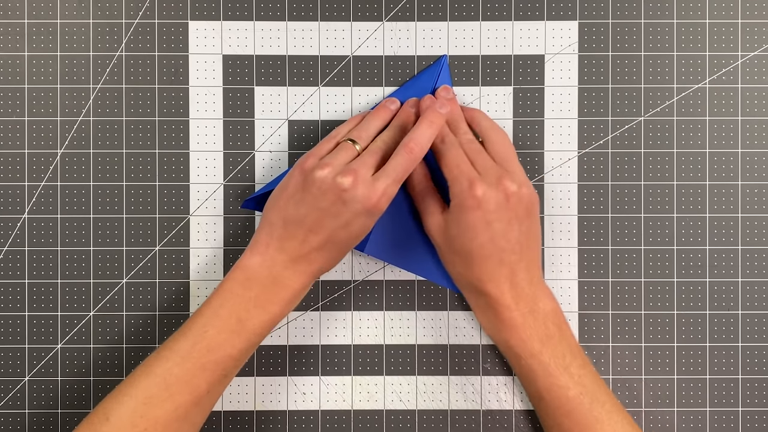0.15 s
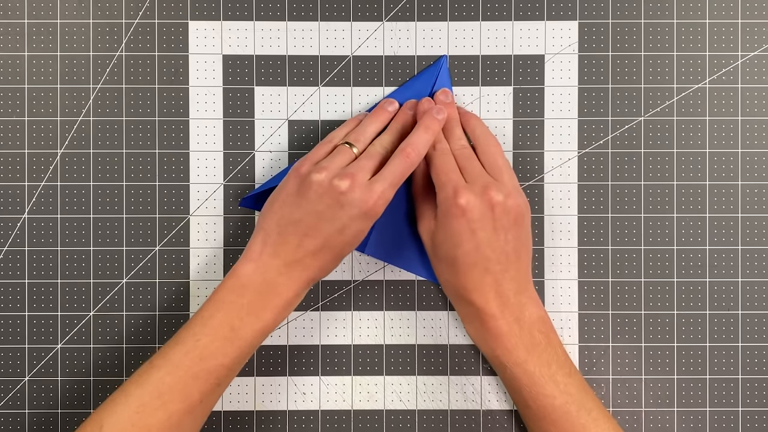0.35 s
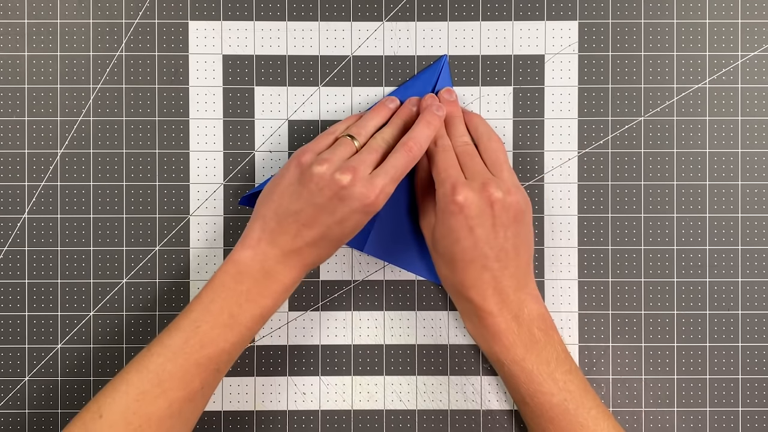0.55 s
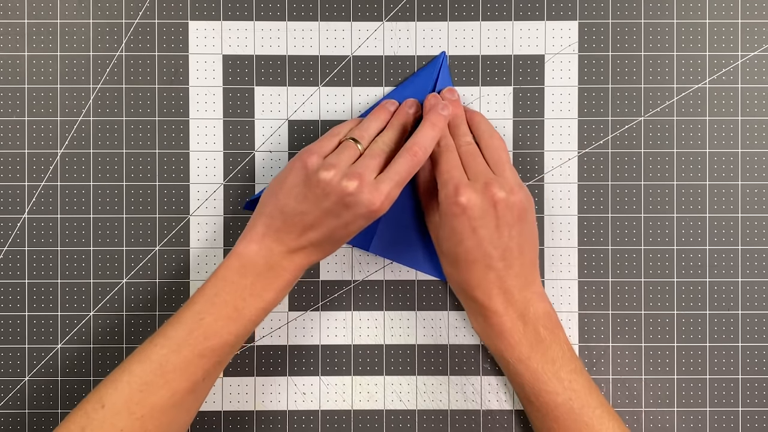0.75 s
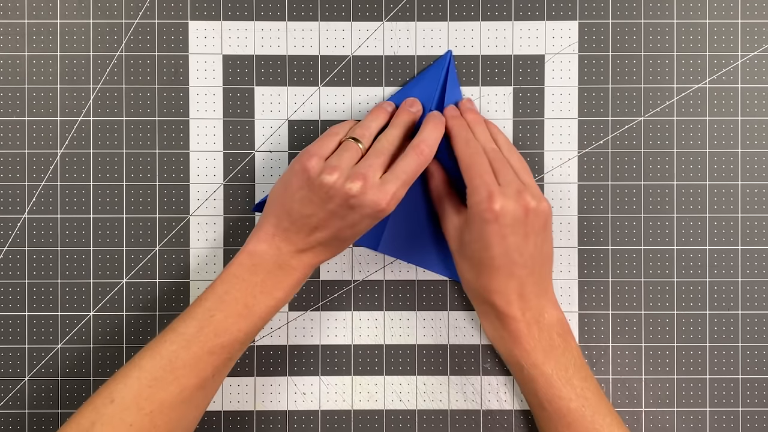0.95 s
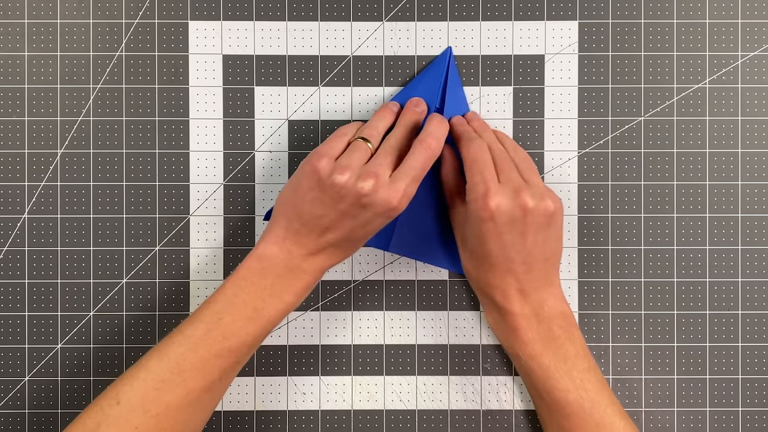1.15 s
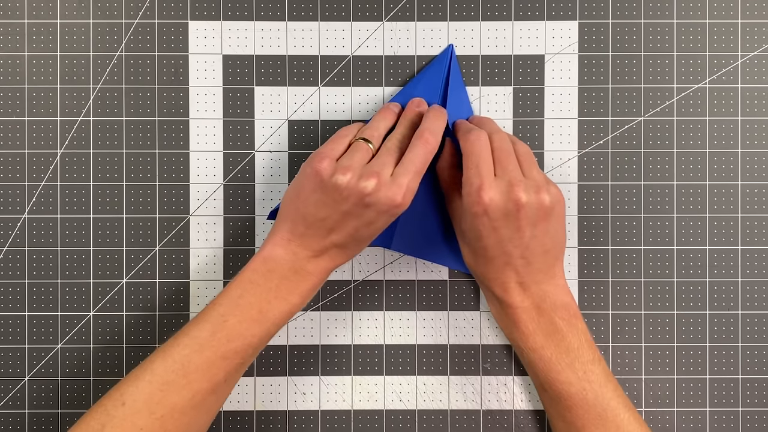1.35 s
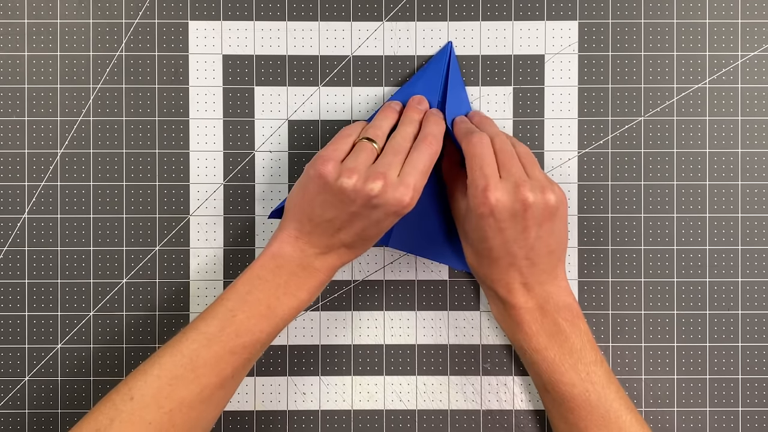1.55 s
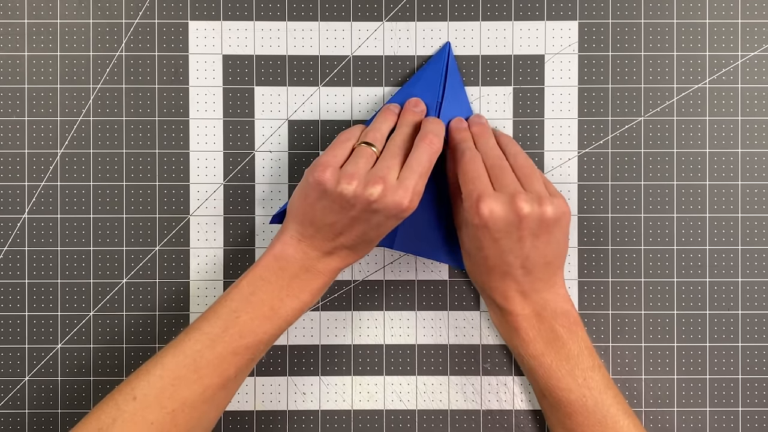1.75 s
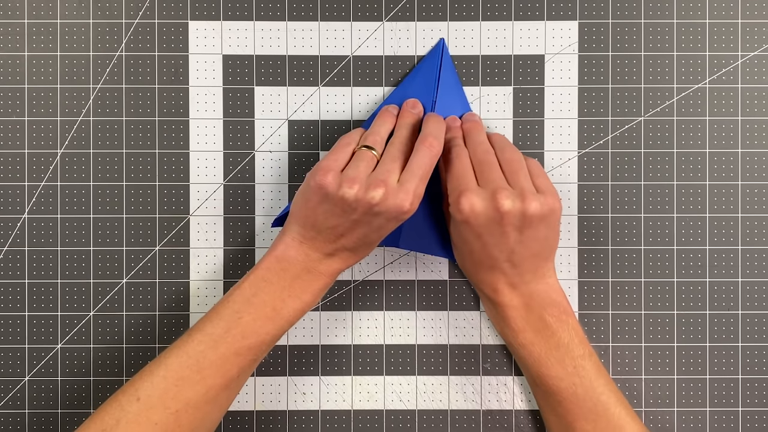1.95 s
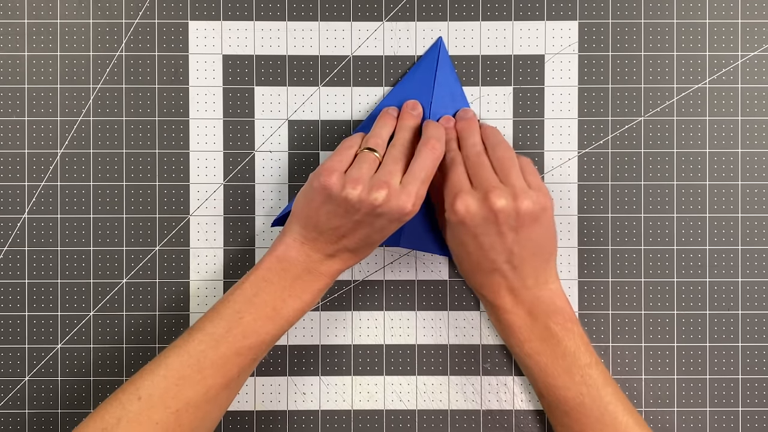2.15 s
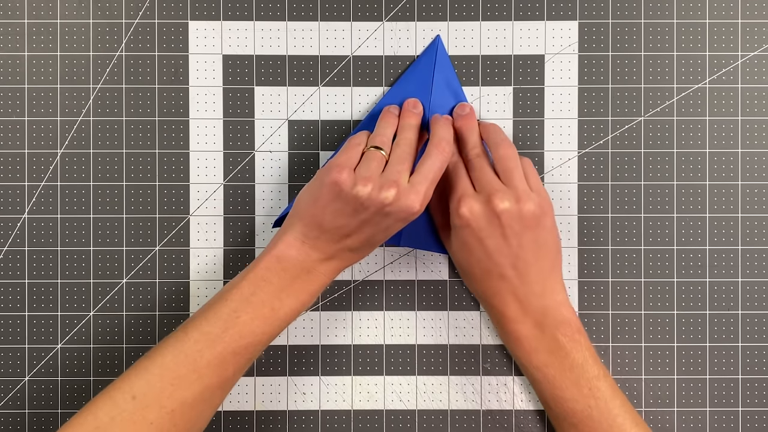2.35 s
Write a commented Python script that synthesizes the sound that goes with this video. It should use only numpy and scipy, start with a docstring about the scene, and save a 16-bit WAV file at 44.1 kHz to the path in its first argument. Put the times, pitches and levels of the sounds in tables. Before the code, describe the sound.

Paper folding heard close up: soft sliding rustles and crisp little snaps in irregular clusters, strongest near 0.3, 1.4 and 2.2 seconds, with quiet gaps, in a small quiet room with faint hiss.

```python
"""In a small room, a sheet of paper is folded on a cutting mat, close to a microphone.
Fingers slide along the folds as friction noise, swelling and fading with each jerky stroke.
The sheet buckles in short snaps, decaying bursts of fibre slips, as the crease is pressed flat.
Damped modes of the table hum softly under two presses.
The room answers the paper with near reflections and a short diffuse tail, over a faint hiss."""
import sys
import numpy as np
from scipy import signal
from scipy.io import wavfile
from scipy.ndimage import uniform_filter1d

SR = 44100
rng = np.random.default_rng(int(sys.argv[2]) if len(sys.argv) > 2 else 0)


def waveform_to_disk(signal):
    """Save audio, clipped to [-1, 1], as 16-bit WAV at the path in sys.argv[1]."""
    frames = np.transpose(np.atleast_2d(signal))
    scaled = np.clip(frames, -1, 1) * 32767
    samples = np.round(scaled).astype(np.int16)
    wavfile.write(sys.argv[1], SR, samples)


N = 110250

# Borders of the sheet's four registers, push, body, crack and edge: (frequency [Hz])
BAND_BORDERS_HZ = [180, 750, 2250, 5200, 15500]


def amp(db):
    """Level law: 20 dB is a tenfold amplitude."""
    return 10 ** (np.asarray(db) / 20)


def unit(x):
    """Normalization: scales the mean power, and so the rms, to 1."""
    return x / np.sqrt(np.mean(x ** 2) + 1e-20)


def read(points, hz):
    """Spectral interpolation: a table is read along a logarithmic frequency axis."""
    f, value = np.transpose(points)
    return np.interp(np.log(hz + 1), np.log(f + 1), value)


def add(mix, s, sound):
    """Superposition: a sound is summed into the mix from time s [s], cut at the end of the mix."""
    part = mix[round(s * SR):][:len(sound)]
    part += sound[:len(part)]


def colour(x, points, size=4096):
    """Minimum-phase filtering: the Hilbert transform of the log gain gives the phase of a causal filter."""
    hz = abs(np.fft.fftfreq(size, 1 / SR))
    log_gain = np.log(amp(read(points, hz)))
    response = np.exp(np.conj(signal.hilbert(log_gain)))
    taps = np.fft.ifft(response).real[:size // 2]
    return signal.fftconvolve(x, taps)[:len(x)]


def band(x, index):
    """Band-pass filtering: keeps one register, 0 push, 1 body, 2 crack or 3 edge."""
    borders = BAND_BORDERS_HZ[index:index + 2]
    return signal.sosfilt(signal.butter(3, borders, "band", fs=SR, output="sos"), x)


def waver(hz):
    """Low-pass random process: slow irregular motion of rms 1, mostly below hz [Hz]."""
    return unit(signal.sosfilt(signal.butter(2, hz, fs=SR, output="sos"), rng.standard_normal(N)))


def hiss(points):
    """Stationary noise: a steady random signal is shaped to a given spectrum and set to one rms level."""
    level_db = -64
    return amp(level_db) * unit(colour(rng.standard_normal(N), points))


def slides():
    """Stick-slip friction: smooth noise and sparse fibre crackle swell with each jerky stroke."""
    # Strokes of fingers and paper; crack level before colouring, other registers relative to it:
    # (peak time [s], rise [s], fall [s], crack level [dB], push [dB], body [dB], edge [dB])
    strokes = [ (0.029, 0.033, 0.021, -55, -10.5, -3.5, -5.5), (0.134, 0.021, 0.037, -63, 5.5, 3, 3),
               (.248, .06, 0.051, -39.5, -18.5, -5.5, -7), (.335, 0.034, 0.011, -46.5, -24, -9, -1.5),
               (.780, 0.018, 0.051, -56, -3, 2.5, -11), (0.871, .028, 0.019, -49.5, -6.5, -3, 1.5),
               (0.961, 0.018, 0.036, -56, -8, -3.5, -3), (1.02, 0.043, 0.1, -61, -2, -1.5, -5.5),
               (1.24, 0.23, 0.041, -66, -5, -5.5, -3.5), (1.378, 0.024, 0.025, -51, -1, 1, -16),
               (1.445, 0.023, 0.03, -51.5, -15, -3, -22), (1.56, 0.03, 0.068, -68, 0, -2, -14),
               (1.802, 0.019, 0.014, -49, -10, -2.5, -4), (1.90, 0.085, 0.24, -63.5, -4.5, 0, -6),
               (2.025, 0.044, 0.032, -55, -9, 4.5, -11), (2.115, 0.029, 0.057, -53, -12, -6.5, -6),
               (2.202, 0.016, .032, -40, -12, -3.5, -2), (2.44, 0.11, 0.063, -59.5, -2, -1, -14)]
    # Colour of the sliding sheet: (frequency [Hz], gain [dB])
    sheet_gain = [(150, -4.5), (400, -3), (750, -1.5), (1130, 5.5), (1500, 0), (1900, -1), (2400, -0.5),
                  (3200, 6.5), (4600, -9.5), (6500, 1.5), (10000, -3), (15000, -13.5)]
    grains_per_s, grain_spread_db = 1600, 3.5
    grain_share = 0.44  # crackle's part of the power
    jerk_db, jerk_hz = 1.4, 80

    t = np.arange(N) / SR
    power = np.zeros((len(BAND_BORDERS_HZ) - 1, N))
    for s, rise, fall, level_db, push_db, body_db, edge_db in strokes:
        stroke = np.exp(-((t - s) / np.where(t < s, rise, fall)) ** 2)
        register_db = level_db + np.array([push_db, body_db, 0, edge_db])
        power += (amp(register_db)[:, None] * stroke) ** 2

    sizes = amp(grain_spread_db * np.minimum(rng.exponential(1, N), 4)) * rng.choice([-1, 1], N)
    grains = unit(sizes * (rng.random(N) < grains_per_s / SR))
    smooth = rng.standard_normal(N)
    friction = np.sqrt(grain_share) * grains + np.sqrt(1 - grain_share) * smooth
    friction *= amp(jerk_db * waver(jerk_hz))
    registers = [np.sqrt(p) * unit(band(friction, k)) for k, p in enumerate(power)]
    return colour(sum(registers), sheet_gain)


def snap(length, level_db, push_db, body_db, edge_db, size=2048):
    """Impulsive buckling: a click opens a decaying burst of fibre slips, and the mat answers the push."""
    attack_s, fall_power = 0.0004, 0.98
    slip_spread_db = 4.5
    first_tear = 3.3  # strength of the opening click; the slips start from rms 1
    push_decay_s, push_hz = 0.0017, 302  # median frequency of the mat's damped swing
    reference_s = 0.0036  # the level is that of a steady sound of this length and equal energy

    t = np.arange(size) / SR
    attack = 1 - np.exp(-t / attack_s)
    slips = attack * unit(rng.standard_normal(size) * amp(slip_spread_db * rng.standard_normal(size)))
    slips[0] += first_tear
    slips *= np.exp(-(t / length) ** fall_power)

    swing_hz = push_hz * amp(rng.standard_normal())
    swing = np.sin(2 * np.pi * swing_hz * t) * np.exp(-t / push_decay_s)
    scuff = unit(band(slips, 0))
    push = unit(np.gradient(swing) * attack) + scuff

    out = amp(push_db) * unit(push)
    for k, db in enumerate([body_db, 0, edge_db], start=1):
        out += amp(db) * unit(band(slips, k))
    return amp(level_db) * out * np.sqrt(reference_s * SR / size)


def snaps():
    """Sudden release of elastic energy: buckles and stray smaller ticks, coloured by the sheet."""
    # Buckles of the sheet; crack level before colouring, other registers relative to it:
    # (time [s], decay length [s], crack level [dB], push [dB], body [dB], edge [dB])
    buckles = [ (.0950, .003, -48.5, -8, -0.5, -6.5), (0.1209, 0.0015, -46.5, -0.5, 5, -29),
               (0.3008, .002, -45, -15, -15, -10), (0.3135, 0.0015, -38, -27, 0.5, -12),
               (0.3222, 0.0075, -32.5, -26, -4, -8), (0.3259, 0.0038, -33, -16, -8, -7),
               (0.34, 0.0033, -38.5, -18, -9, -13), (0.3782, 0.0047, -28.5, -27, -2, -4),
               (.3836, 0.0017, -29.5, -9.5, 1.5, 1), (0.504, 0.0013, -53, -9, 2, -14),
               (.6230, 0.0035, -48.5, -7, -2.5, -9), (0.6343, 0.0015, -50, -18, 0.5, -6),
               (0.6428, 0.0018, -42, -11, -4.5, -7), (0.7574, 0.001, -50.5, 0.5, 3, -15),
               (0.7636, 0.003, -47.5, -1.5, -2, -16), (0.7861, 0.0057, -67, -9, 12, -10),
               (0.8311, 0.0024, -43.5, -14, 0, -13), (0.9994, 0.0042, -54.5, 2, 5.5, -4),
               (1.2983, 0.0032, -56, -0.5, 7.5, -8), (1.3356, 0.0033, -41, -9, -1, -4),
               (1.3516, 0.0016, -48.5, -1.5, 2, 2.5), (1.3612, .003, -47.5, -4, -9, -7),
               (1.367, 0.0041, -42.5, -15, 3.5, -4), (1.376, 0.0038, -49.5, -24, 10.5, 4),
               (1.4143, 0.0019, -34.5, -31, 1.5, -1), (1.417, 0.0029, -38.5, -22, 5.5, -5),
               (1.4260, 0.0013, -31, -24.5, -3.5, -3.5), (1.4298, 0.0013, -39, -26, -1, -6),
               (1.452, 0.00076, -38.5, -29, -6, -9), (1.5124, 0.0011, -47, 1, -6, 7.5),
               (1.601, 0.0058, -53.5, -6, 4, -9), (1.6987, 0.0035, -54, 1.5, 6, -5),
               (1.7545, 0.0046, -53.5, -1.5, 7, -6), (1.7928, 0.0019, -49.5, 6, 7.5, -14),
               (1.9920, 0.0026, -50.5, -6, -1.5, -10), (2.06, 0.005, -47, -10.5, 5.5, -8),
               (2.0765, 0.0025, -53.5, -17, 14.5, -14), (2.0920, 0.0042, -39.5, -17, 1.5, -8),
               (2.1100, 0.0045, -41.5, -18, 4, -10), (2.1700, 0.0023, -42, -29, -1, -15),
               (2.1930, 0.0035, -28, -14, -8, -6.5), (2.2027, 0.0047, -30, -39, -4, -4),
               (2.2080, 0.0046, -34, -12, -2.5, -13), (2.4195, .003, -52.5, -8, 7, -6),
               (2.4498, 0.0025, -43.5, -18, 0, -6)]
    # Colour of the buckling sheet: (frequency [Hz], gain [dB])
    sheet_gain = [(150, -5.5), (400, 1), (800, -6.5), (1100, 1.5), (1450, 4), (1800, -3), (2400, -1),
                  (3400, 5), (4800, -3.5), (7000, 1), (10000, -2), (15000, -13)]
    ticks_per_s, tick_db, tick_spread_db = 12, -62.5, 3.5

    out = np.zeros(N)
    for s, *shape in buckles:
        add(out, s, snap(*shape))
    for when, draw in rng.random((round(ticks_per_s * N / SR), 2)):
        level_db = tick_db - tick_spread_db * np.log(draw + 0.081)  # few ticks are loud
        add(out, when * N / SR, snap(0.0021, level_db, -12, -1.8, -13))
    return colour(out, sheet_gain)


def panels(x, size=256):
    """Shifting resonance: as the fingers reshape the paper's panels, some bands rise and others sink."""
    spread_db, width_hz, drift_s = 2.5, 450, 0.05
    overlap = size * 3 // 4
    z = signal.stft(x, nperseg=size, noverlap=overlap)[2]
    field = rng.standard_normal(z.shape[::-1]).T
    field = uniform_filter1d(field, round(width_hz * size / SR), axis=0)
    field = uniform_filter1d(field, round(drift_s * SR * 4 / size), axis=1)
    field -= uniform_filter1d(field, size=9, axis=0)  # leaves only local peaks and dips
    gain = unit(amp(spread_db * unit(field)))
    return signal.istft(z * gain, nperseg=size, noverlap=overlap)[1][:N]


def tail(size=32768):
    """Diffuse reverberation: dense random reflections decay exponentially, at a rate set by frequency."""
    # Reverberation time of the room: (frequency [Hz], time to fall by 60 dB [s])
    decay_times = [(150, 0.06), (400, 0.27), (1040, 0.2856), (2760, 0.3), (7280, 0.246), (15000, 0.3)]
    # Colour of the diffuse sound: (frequency [Hz], gain [dB])
    room_gain = [(150, 3), (600, -0.5), (1300, 1), (3300, 0), (5000, 1), (9000, -5), (15000, -5)]
    level_db, delay_s = -9, 0.0034  # level before colouring

    hz, t, z = signal.stft(rng.standard_normal(size), SR, nperseg=256)
    decay = amp(-60 * t / read(decay_times, hz)[:, None])
    taps = signal.istft(z * decay, SR)[1][:size]
    taps *= np.clip(np.arange(size) / SR / delay_s - 1, 0, 1)  # silent for one delay, full after two
    return amp(level_db) * colour(taps / np.linalg.norm(taps), room_gain)


def room(x):
    """Convolution with an impulse response: near reflections and tail in the mid, a second tail in the side."""
    # Nearby surfaces: (delay [s], level [dB])
    surfaces = [(.0035, -16.5), (.0082, -16.5), (0.0117, -21.5)]
    # Width of the diffuse tail: (frequency [Hz], side gain [dB])
    side_gain = [(100, -20), (400, -17), (1200, -31), (2500, -37), (5000, -16), (15000, 4)]
    mid = tail()
    for s, db in surfaces:
        add(mid, s, amp(db) * np.array([.5, .5]))  # two equal taps soften the treble
    side = colour(tail(), side_gain)
    return signal.fftconvolve(x, mid)[:N], signal.fftconvolve(x, side)[:N]


def table():
    """Modal vibration: each press excites damped modes of the table, heard as a low, soft, wavering hum."""
    # Presses on a fold; level before the rise and the wavering: (time [s], level [dB])
    presses = [(0.414, -46), (2.203, -47)]
    # Modes of the table: (frequency [Hz], relative level [dB], time to fall by 60 dB [s])
    modes = [(202, 0.5, .3), (178, -6.5, .22), (236, -15, .14)]
    rise_s, waver_db, waver_hz = 0.011, 3, 30

    t, out = np.arange(SR) / SR, np.zeros(N)
    ring = sum(amp(db - 60 * t / t60) * np.cos(2 * np.pi * hz * t) for hz, db, t60 in modes)
    ring *= 1 - np.exp(-t / rise_s)
    for s, db in presses:
        add(out, s, amp(db) * ring)
    return out * amp(waver_db * waver(waver_hz))


def scene():
    """Mid-side stereo: paper and table stand in the centre, while room and hiss also have a side signal."""
    # Spectra of the hiss in the mid and in the side: (frequency [Hz], relative density [dB per Hz])
    mid_spectrum = [(27, -30), (42, 5.5), (60, -1.5), (110, -3), (200, 0), (400, -8), (1150, -8.5),
                    (2000, -12), (3000, -3), (4500, -14.5), (9000, -16.5), (15000, -27.5)]
    side_spectrum = [(60, 2.5), (400, -1), (2000, -7), (15000, -5)]
    hiss_side_db = -11  # relative to the mid hiss

    paper = panels(slides() + snaps())
    echo, echo_side = room(paper)
    mid = hiss(mid_spectrum) + paper + echo + table()
    side = echo_side + amp(hiss_side_db) * hiss(side_spectrum)
    return np.array([mid + side, mid - side])


def record(dry):
    """Band limitation: a linear-phase low-pass filter sets the recorder's upper limit."""
    cutoff_hz = 16200
    taps = signal.firwin(255, cutoff_hz, window=("kaiser", 8), fs=SR)
    return signal.oaconvolve(dry, taps[None], "same", axes=1)


dry = scene()
out = record(dry)
waveform_to_disk(out)
```